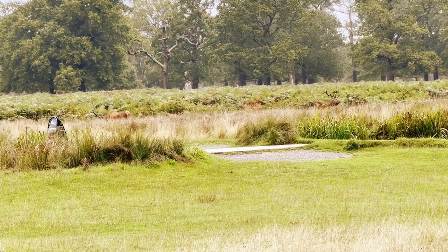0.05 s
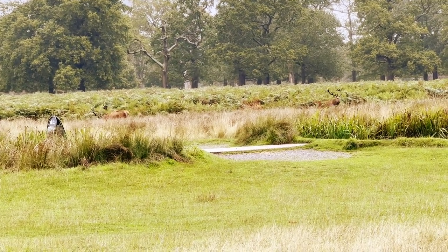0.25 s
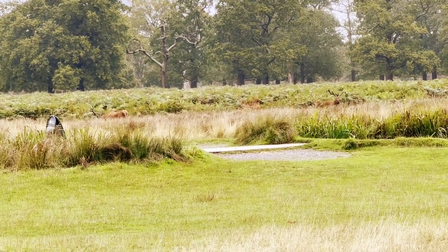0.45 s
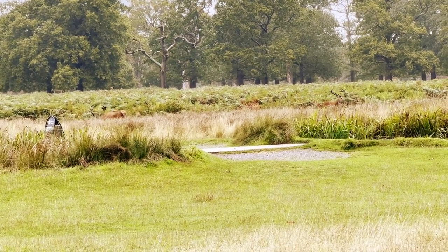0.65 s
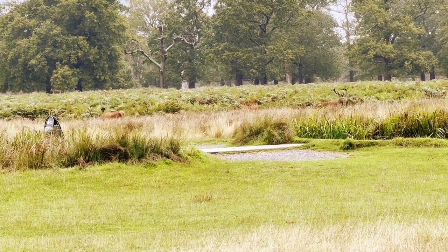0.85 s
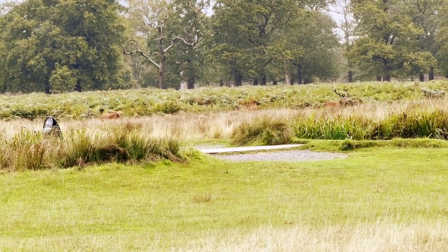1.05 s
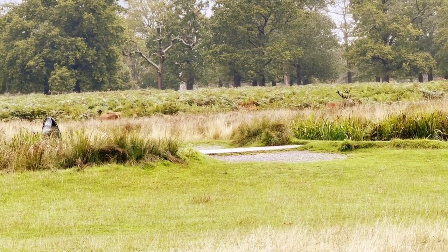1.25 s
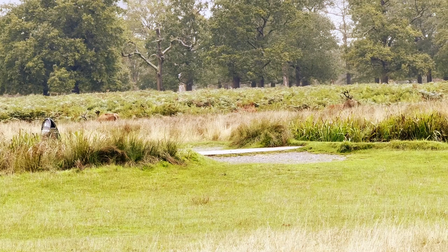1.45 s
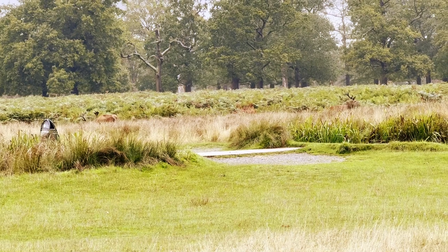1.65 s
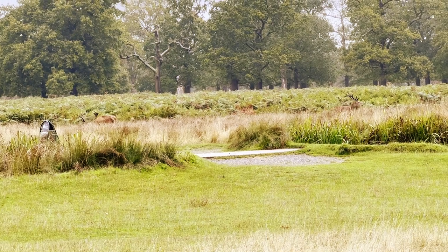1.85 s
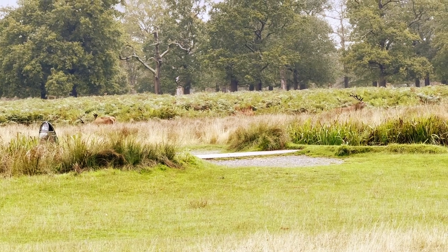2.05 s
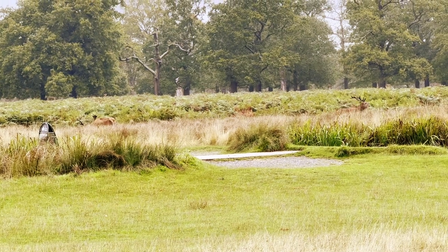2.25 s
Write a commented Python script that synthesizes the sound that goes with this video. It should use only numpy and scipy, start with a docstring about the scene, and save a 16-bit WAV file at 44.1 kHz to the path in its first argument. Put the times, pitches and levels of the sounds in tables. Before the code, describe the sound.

A gust thumps and rumbles on the microphone, over faint distant birds in open parkland.

```python
"""A light breeze, the hush of open parkland and a faint held tone, with far birds whistling.
Almost at once a gust buffets the microphone: its eddies thump and rumble, then die away by 1 s.
Birds chip, rasp and yelp; foliage blurs the whistles and rasps, and the tree line echoes them.
A few single eddies puff through the breeze after the gust."""
import sys
import numpy as np
from scipy import signal
from scipy.fft import rfft, irfft
from scipy.io import wavfile
from scipy.ndimage import uniform_filter1d

SR = 44100
rng = np.random.default_rng(int(sys.argv[2]) if len(sys.argv) > 2 else 0)


def store_pcm(level_fs):
    """Save levels as 16-bit WAV."""
    pcm = np.round(np.clip(level_fs, -1, 1) * 32767).astype(np.int16)
    wavfile.write(sys.argv[1], SR, np.atleast_2d(pcm).T)


N = 101430
T = np.arange(N) / SR
BLUR_T60_S, ECHO_T60_S, ECHO_DELAY_S = .36, .88, .039


def undb(db):
    """Decibels to amplitude."""
    return 10 ** (np.asarray(db) / 20)


def unit(x):
    """Scale to rms 1."""
    return x / np.sqrt(np.mean(x ** 2))


def curve(points, smooth_s=.012):
    """Join (t, value) rows by straight lines with rounded corners."""
    line = np.interp(T, *np.array(points).T)
    return uniform_filter1d(line, size=int(smooth_s * SR), mode="nearest")


def noise(spectrum):
    """Noise of rms 1, coloured by (Hz, dB) rows and rolled off below the first."""
    hz, db = np.array(spectrum).T
    f = np.maximum(np.fft.rfftfreq(N, 1 / SR), 1)
    colour = undb(np.interp(np.log(f), np.log(hz), db))
    low_cut = np.minimum(f / hz[0], 1) ** 2
    return unit(irfft(rfft(rng.standard_normal(N)) * colour * low_cut, N))


def walk(band_hz):
    """Smooth random motion of rms 1, mostly below band_hz."""
    f = np.fft.rfftfreq(N, 1 / SR)
    return unit(irfft(rfft(rng.standard_normal(N)) * np.exp(-(f / band_hz) ** 2), N))


def tone(hz):
    """Sine of rms 1 on a moving pitch."""
    return np.sqrt(2) * np.sin(2 * np.pi * np.cumsum(hz) / SR)


def spread(side):
    """Opposite signs left and right."""
    return np.array([side, -side])


def pan(left_db):
    """Stereo gains for a left-minus-right level."""
    return undb(np.array([[left_db], [-left_db]]) / 2)


def lead(x, left_rad):
    """Stereo with a phase step between the two microphone ports."""
    return np.real(signal.hilbert(x) * np.exp(.5j * np.array([[left_rad], [-left_rad]])))


def scatter(x, delay_s, t60_s):
    """Dense, fading cloud of reflections."""
    fade = (T > delay_s) * np.exp(-np.log(1000) * T / t60_s)
    response = unit(fade * rng.standard_normal(N)) / np.sqrt(N)
    return signal.fftconvolve(x, response)[:N]


def call_shape(start_s, length_s, attack_share=.35, release_share=.26):
    """Progress 0-1 through a call, and its attack-hold-release envelope."""
    progress = np.clip((T - start_s) / length_s, 0, 1)
    ramp = np.minimum(progress / attack_share, (1 - progress) / release_share)
    return progress, np.sin(np.pi / 2 * np.clip(ramp, 0, 1)) ** 2


def glides(calls, waver, ease=2.4):
    """Near-pure calls that slide fast at first, then settle on their last pitch."""
    out = np.zeros(N)
    wobble = 1 + waver * walk(200)
    for start_s, length_s, first_hz, last_hz, db in calls:
        progress, envelope = call_shape(start_s, length_s)
        hz = last_hz + (first_hz - last_hz) * (1 - progress) ** ease
        out += undb(db) * envelope * tone(hz * wobble)
    return out


def hoarse(hz, width_hz):
    """Rough band around one pitch."""
    return walk(width_hz / 2) * tone(hz + width_hz / 8 * walk(300))


# f/Hz, relative density/dB
BREEZE_SPECTRUM = [(20, -14), (43, 3), (72, 0.5), (120, 1), (170, -3.5), (240, -14.5), (400, -30.5),
                   (800, -66)]


def breeze(level_db=-54, ease_db_per_s=1.16, side_db=-14.5):
    """Light wind: a low rumble that slowly eases."""
    mid = noise(BREEZE_SPECTRUM) * pan(left_db=1.94)
    side = undb(side_db) * spread(noise(BREEZE_SPECTRUM))
    return undb(level_db - ease_db_per_s * T) * (mid + side)


# In phase on both sides: f/Hz, relative density/dB
HUSH_MID_SPECTRUM = [(100, -6), (200, -1.5), (360, 2.5), (460, -4), (600, -6), (800, -10), (1000, -12.5),
                     (1300, -20.5), (2200, -25), (2800, -36), (4000, -35.5), (5200, -41.5), (7400, -42.5),
                     (8500, -58.5), (15000, -42.5)]
# In antiphase: f/Hz, relative density/dB
HUSH_SIDE_SPECTRUM = [(100, -3.5), (350, -2.5), (550, 1.5), (950, -2), (1300, -11.5), (2000, -30),
                      (3000, -36.5), (5000, -40), (13000, -34), (15000, -49.5)]


def hush(mid_db=-62, side_db=-67.5):
    """Wide, steady noise of the distance."""
    mid = undb(mid_db) * noise(HUSH_MID_SPECTRUM)
    side = undb(side_db) * spread(noise(HUSH_SIDE_SPECTRUM))
    return mid + side * pan(left_db=3.5)


# t/s, level/dB
TONE_LEVEL = [(0, -72.5), (.15, -68), (.35, -74.5), (.52, -64), (.79, -77), (.85, -58), (.92, -72),
              (1.1, -70), (1.3, -74.5), (1.7, -73.5), (2.3, -94)]


def held_tone(hz=502.8, waver=.012, flicker_db=2):
    """Faint, far tone, unsteady in level and pitch."""
    envelope = undb(curve(TONE_LEVEL) + flicker_db * walk(15))
    return envelope * tone(hz * (1 + waver * walk(38))) * pan(left_db=6)


# start/s, length/s, first f/Hz, last f/Hz, level/dB
WHISTLE_CALLS = [(.092, 0.069, 4345, 3698, -68), (.33, 0.036, 3307, 3657, -78),
                 (.33, 0.035, 1466, 1820, -75), (.365, 0.046, 1850, 1475, -73), (.38, 0.1, 2530, 1836, -81),
                 (.415, 0.097, 4314, 3596, -69), (.565, .125, 2730, 2216, -75.5),
                 (.765, 0.052, 3140, 2640, -83.5), (.88, 0.046, 2330, 2250, -78.5),
                 (1.09, 0.12, 3014, 2100, -88.5), (1.328, 0.036, 2400, 2290, -79.5),
                 (1.405, .055, 4830, 3610, -84), (1.53, 0.052, 2480, 2240, -82.5),
                 (1.755, 0.023, 3430, 2990, -82.5), (1.855, 0.069, 2290, 1975, -84.5),
                 (2.012, 0.031, 2450, 2250, -76), (2.055, .04, 4720, 4500, -87.5),
                 (2.255, .024, 2440, 2150, -74.5)]


def whistles():
    """Far birds: short whistles, mostly falling."""
    return glides(WHISTLE_CALLS, waver=.011)


def flock(calls_per_s=9.8, centre_hz=1902, length_s=.086, fall_ratio=1.25, level_db=-83):
    """Birds farther off: blurred, falling whistles at random times and pitches."""
    calls = []
    for when, pitch, size in rng.random((int(calls_per_s * N / SR), 3)):
        last_hz = centre_hz * 2 ** (pitch - .5)
        db = level_db + 6 * (size - .5)
        calls.append((when * N / SR, length_s, fall_ratio * last_hz, last_hz, db))
    return scatter(glides(calls, waver=.035), 0, BLUR_T60_S)


def tree_line(calls, blur_db=-6.5, echo_db=-9, side_db=-10.5):
    """Leaves and trunks blur each call; the tree line returns a fading echo."""
    blurred = calls + undb(blur_db) * scatter(calls, 0, BLUR_T60_S)
    mid, side = (undb(echo_db) * scatter(calls, ECHO_DELAY_S, ECHO_T60_S) for _ in range(2))
    return lead(blurred + mid, left_rad=.4) + undb(side_db) * spread(side)


# t/s, level/dB
GUST_LEVEL = [(0, -75), (.15, -58), (.185, -39.5), (.205, -49.5), (.25, -16.5), (.308, -20.5),
              (.332, -31.5), (.374, -13.5), (.43, -17), (.52, -19.5), (.6, -23), (.644, -22), (.7, -30),
              (.72, -43.5), (.75, -23), (.772, -19), (.808, -45.5), (.832, -28.5), (.86, -49),
              (.916, -44.5), (1., -84), (1.1, -106)]
# f/Hz, relative density/dB
TURBULENCE_SPECTRUM = [(20, -24), (40, -6), (56, 2), (110, 3.5), (165, 0), (205, -15.5), (250, -23),
                       (320, -36.5), (430, -48.5), (1300, -89.5)]
# t/s, level/dB
FLUTTER_LEVEL = [(.2, -73.5), (.262, -34.5), (.305, -37.5), (.335, -44.5), (.37, -33), (.44, -25),
                 (.485, -41.5), (.53, -41), (.555, -48.5), (.64, -41), (.72, -60), (.775, -42), (.8, -55),
                 (.83, -45.5), (.87, -46), (.915, -54.5), (.97, -70), (1.1, -95.5)]
# f/Hz, relative density/dB
FLUTTER_SPECTRUM = [(120, -8), (165, 4), (205, -4), (245, -7.5), (320, -21.5), (430, -37), (700, -52.5),
                    (1300, -80.5)]


def gust(eddy_hz=76, wander=.13, eddy_db=-1.5, flicker_db=1.5, turbulence_db=-6, growth_db_per_db=.91):
    """Eddies shed unevenly from the microphone, with turbulence and a higher flutter."""
    force_db = curve(GUST_LEVEL)
    eddies = tone(eddy_hz * np.exp(wander * walk(44.3)))
    eddies *= undb(eddy_db + flicker_db * walk(30))
    # Turbulence fades a little less than the eddies.
    lift_db = (growth_db_per_db - 1) * (force_db - force_db.max())
    turbulence = undb(turbulence_db + lift_db) * noise(TURBULENCE_SPECTRUM)
    flutter = undb(curve(FLUTTER_LEVEL)) * noise(FLUTTER_SPECTRUM)
    return undb(force_db) * (eddies + turbulence) + flutter


# start/s, decay/s, centre f/Hz, width/Hz, level/dB
CHIP_CALLS = [(.539, 0.056, 6790, 759, -75), (0.813, 0.043, 6700, 1300, -80)]


def chips(attack_s=.004):
    """A nearer small bird: thin, high chips that start crisply and die away."""
    out = np.zeros(N)
    for start_s, decay_s, hz, width_hz, db in CHIP_CALLS:
        age_s = np.maximum(T - start_s, 0)
        envelope = np.minimum(age_s / attack_s, 1) * np.exp(-age_s / decay_s)
        out += undb(db) * envelope * hoarse(hz, width_hz)
    return out


# start/s, length/s, centre f/Hz, width/Hz, level/dB
RASP_CALLS = [(.76, 0.086, 3223, 807, -82.5), (1.415, 0.046, 3930, 680, -79),
              (1.415, 0.27, 2278, 2040, -80.5), (1.964, 0.17, 3090, 704, -81.5),
              (2.008, .17, 3870, 800, -84.5)]


def rasps():
    """Hoarse bird chatter that swells and fades."""
    out = np.zeros(N)
    for start_s, length_s, hz, width_hz, db in RASP_CALLS:
        _, envelope = call_shape(start_s, length_s)
        out += undb(db) * envelope * hoarse(hz, width_hz)
    return out


# start/s, length/s, first f/Hz, last f/Hz, level/dB
YELP_CALLS = [(.86, 0.065, 1135, 1120, -72), (1.372, 0.044, 755, 775, -62), (2.208, 0.0335, 641, 965, -62)]


def yelps(echo_db=-10):
    """Short, low calls from across the grass, with a weak echo."""
    calls = glides(YELP_CALLS, waver=.02)
    return calls + undb(echo_db) * scatter(calls, ECHO_DELAY_S, ECHO_T60_S)


# t/s, peak level/dB
PUFF_PEAKS = [(1.155, -42), (1.308, -59), (1.499, -53), (1.75, -48.5), (1.867, -38.5)]


def puffs(hz=77, half_width_s=.0087):
    """Single eddies, each a short swing of pressure."""
    out = np.zeros(N)
    for peak_s, db in PUFF_PEAKS:
        envelope = np.exp(-((T - peak_s) / half_width_s) ** 2)
        out += undb(db) * envelope * np.cos(2 * np.pi * hz * (T - peak_s))
    return out


def scene():
    """Wind at the microphone over the park's background and birds, in stereo."""
    wind = lead(gust() + puffs(), left_rad=-.61) + breeze()
    background = hush() + held_tone()
    birds = tree_line(whistles() + flock() + rasps()) + chips() + yelps()
    return wind + background + birds


def record(dry, ring_hz=9600, ring_db=-67.5, top_hz=15700):
    """The recorder adds a faint high ring that rides on the sound, and cuts the top."""
    ring = undb(ring_db) * tone(np.full(N, ring_hz))
    low_pass = signal.ellip(8, .2, 70, top_hz, fs=SR, output="sos")
    return signal.sosfilt(low_pass, dry * (1 + ring))


dry = scene()
out = record(dry)
store_pcm(out)
```